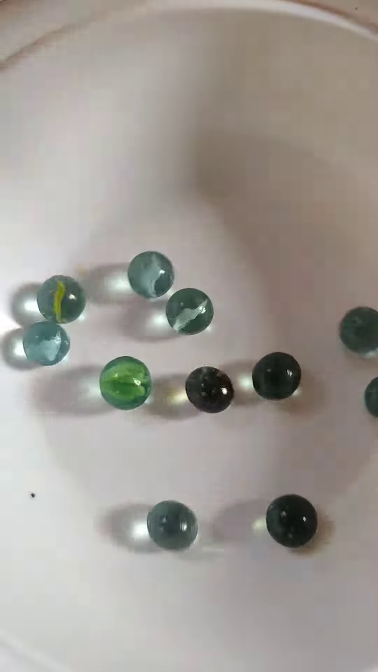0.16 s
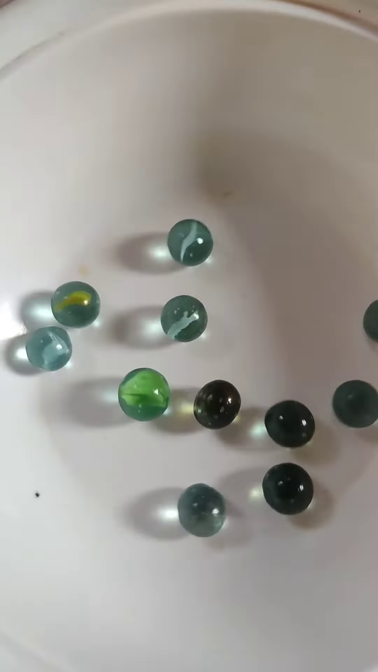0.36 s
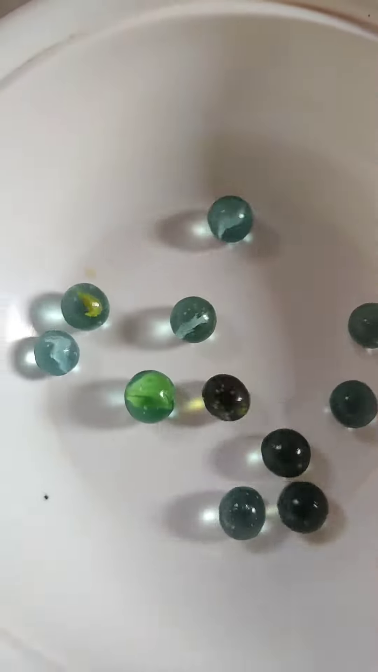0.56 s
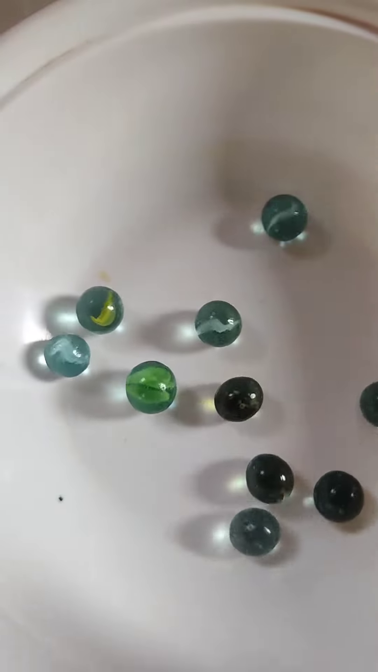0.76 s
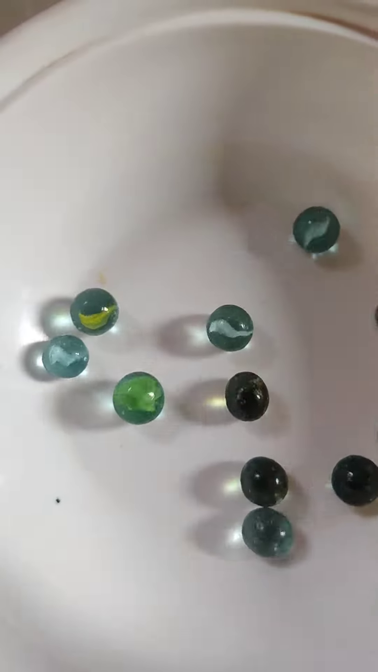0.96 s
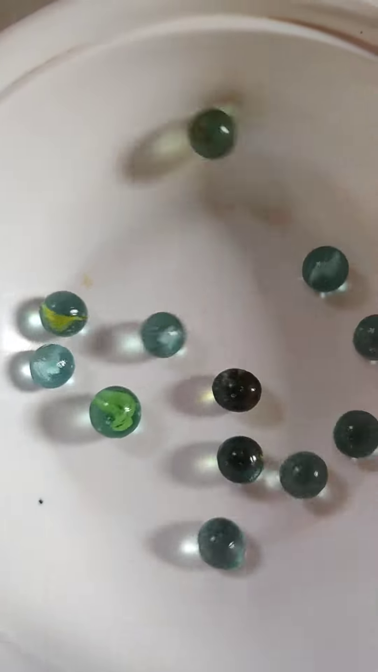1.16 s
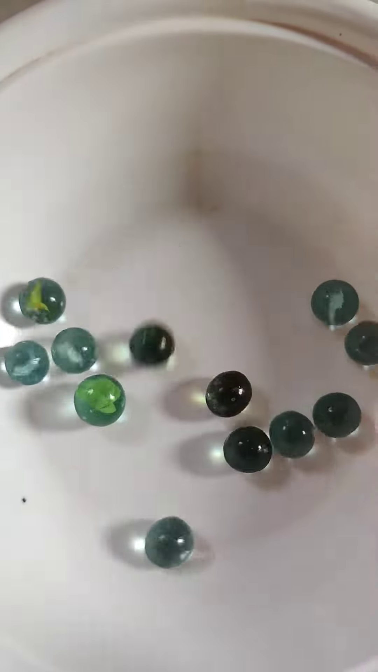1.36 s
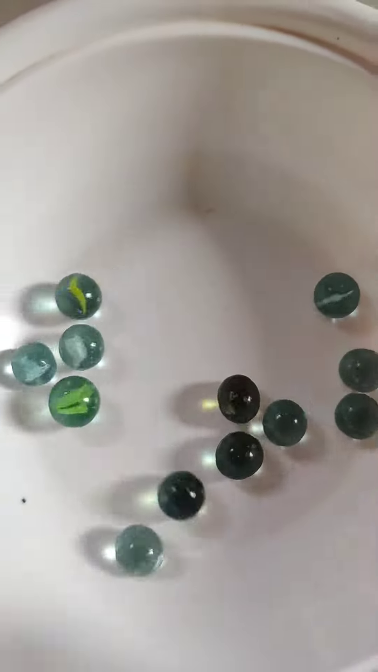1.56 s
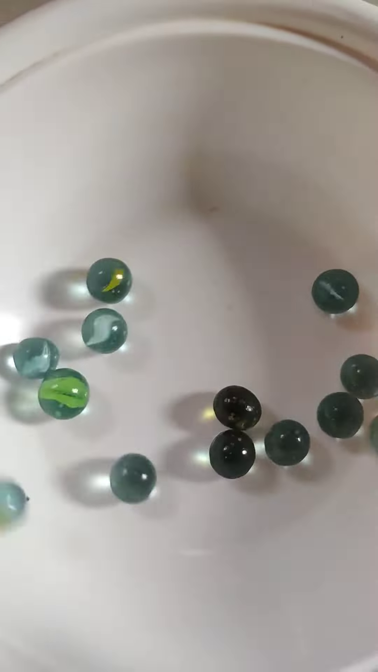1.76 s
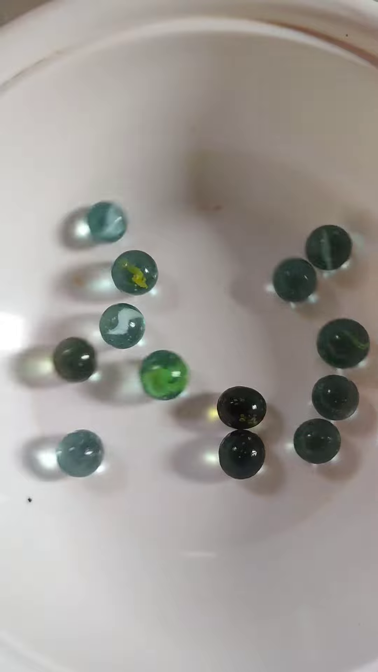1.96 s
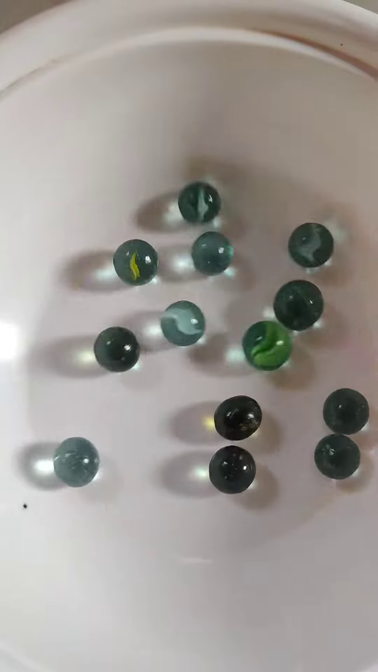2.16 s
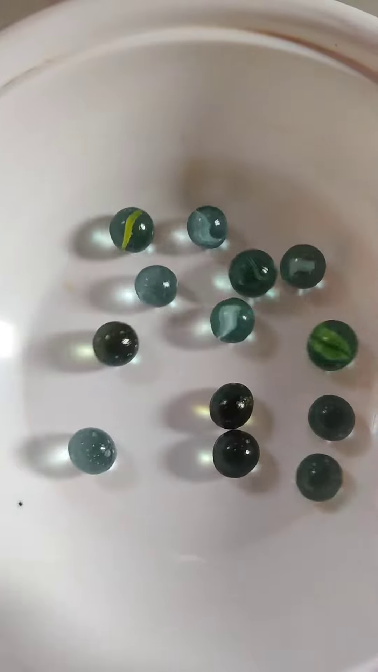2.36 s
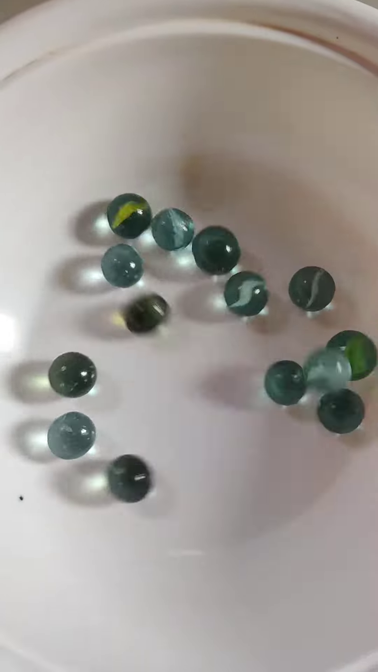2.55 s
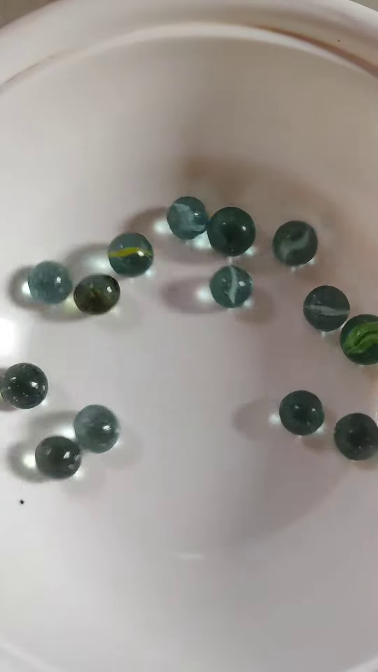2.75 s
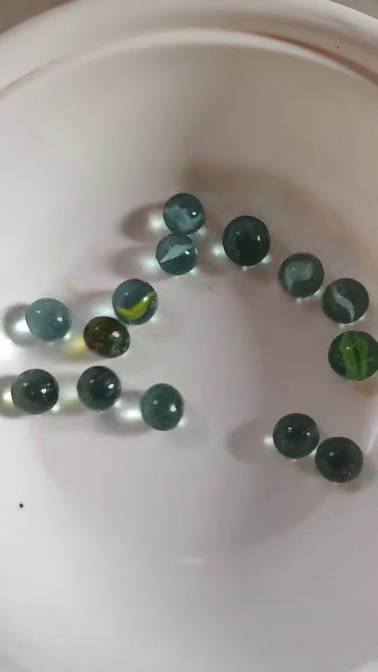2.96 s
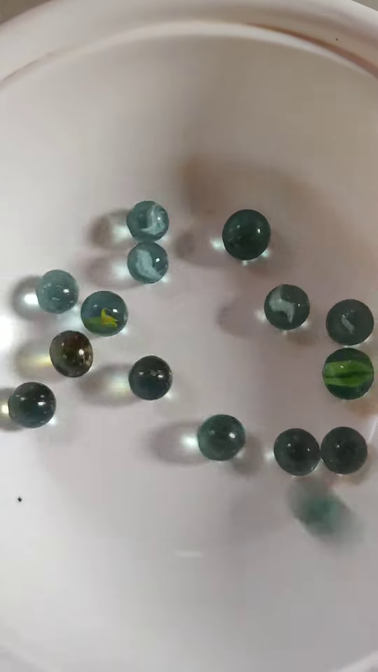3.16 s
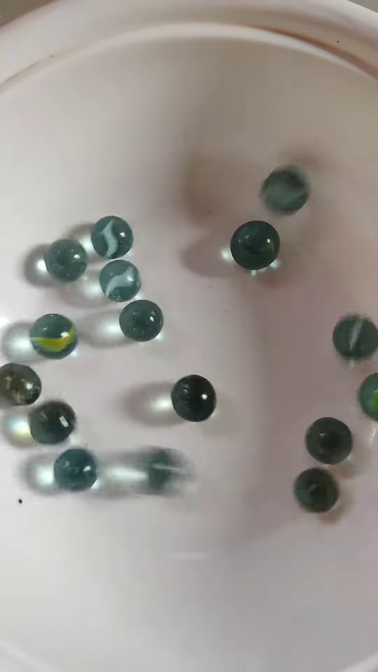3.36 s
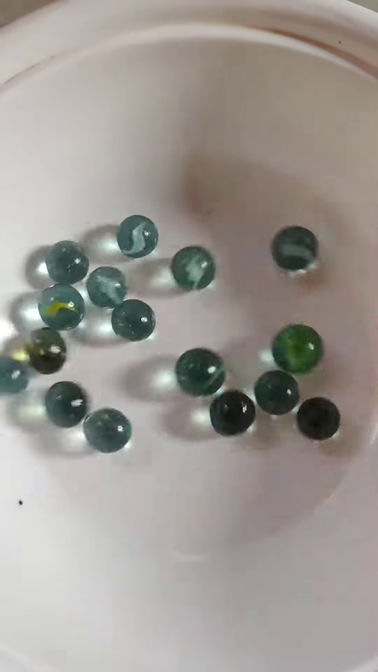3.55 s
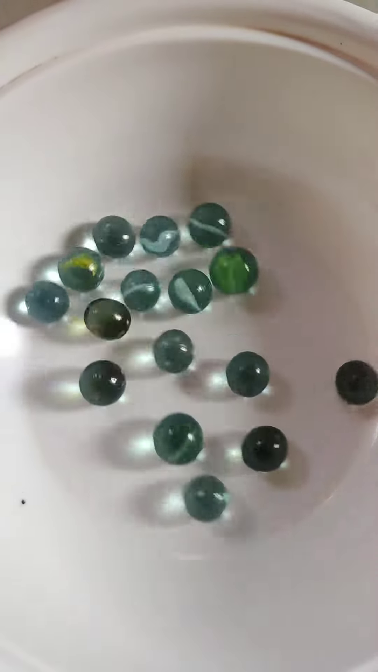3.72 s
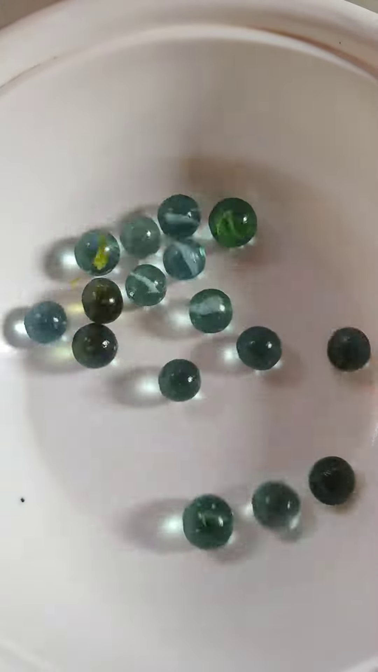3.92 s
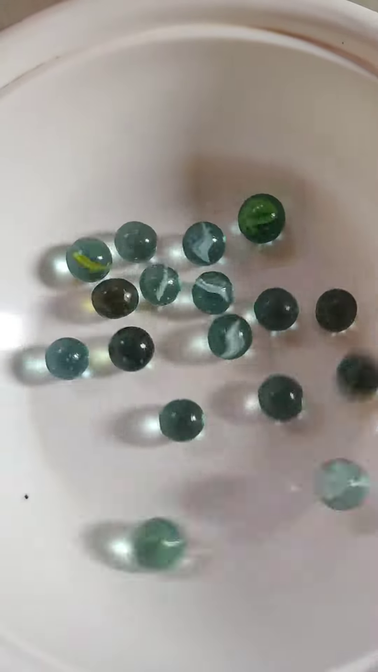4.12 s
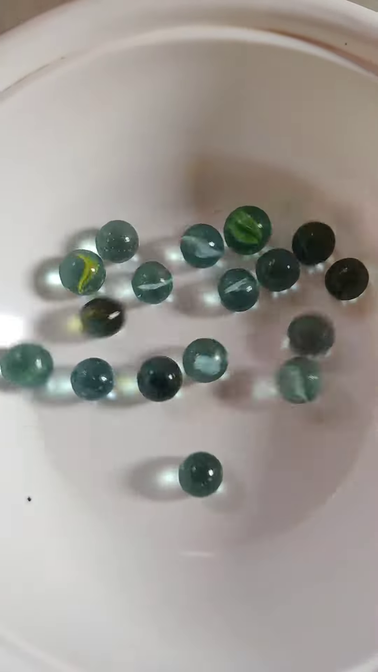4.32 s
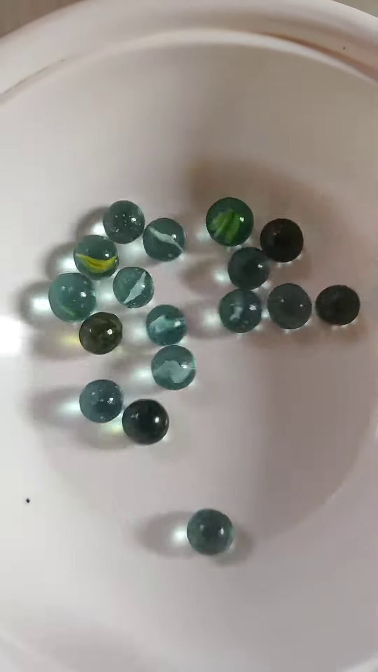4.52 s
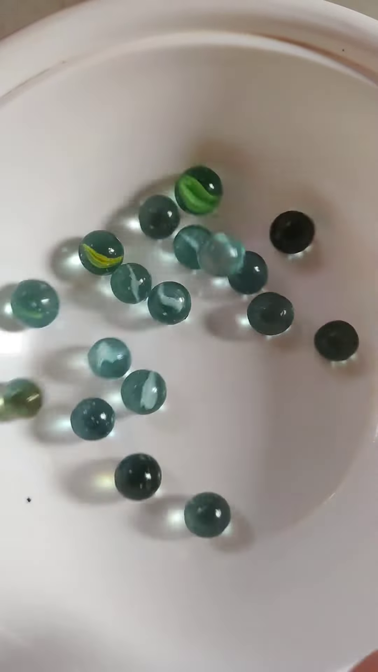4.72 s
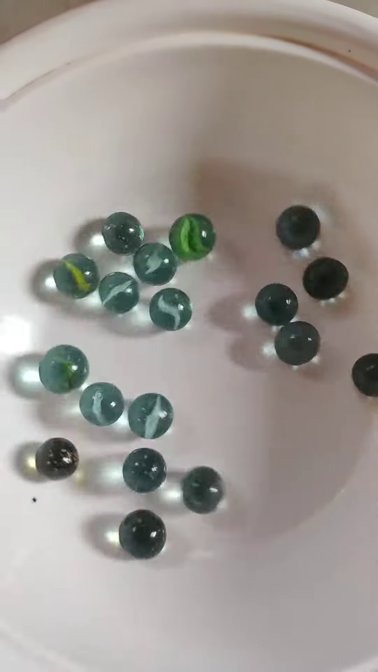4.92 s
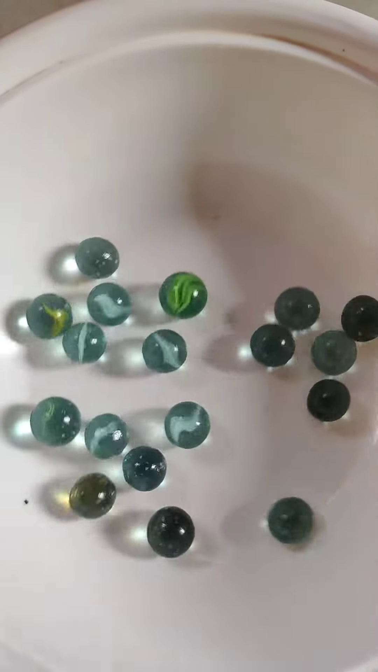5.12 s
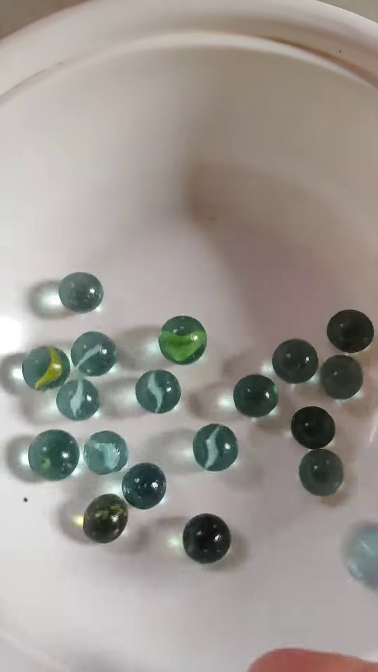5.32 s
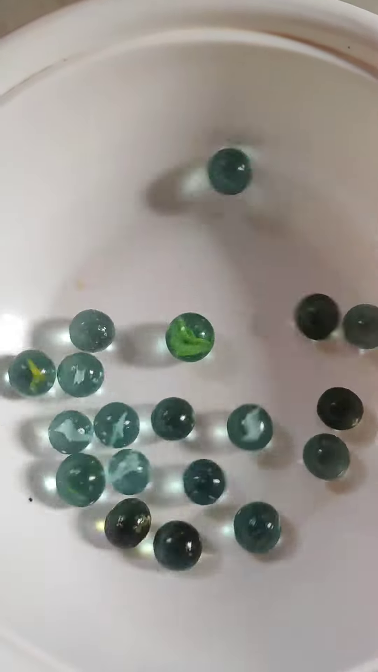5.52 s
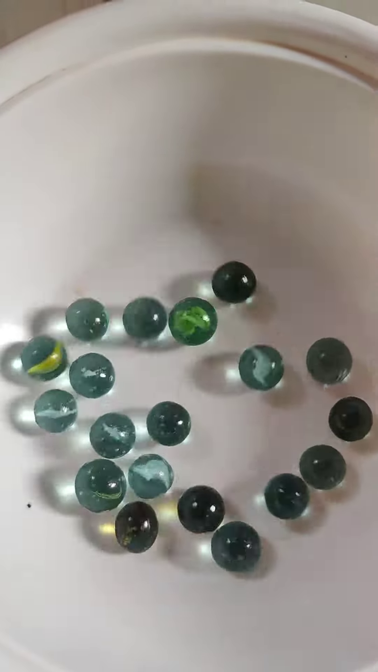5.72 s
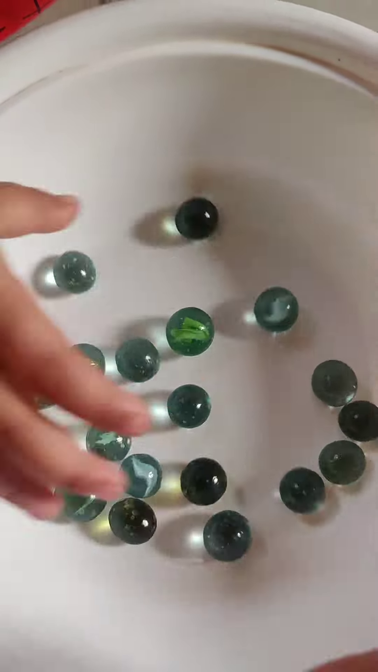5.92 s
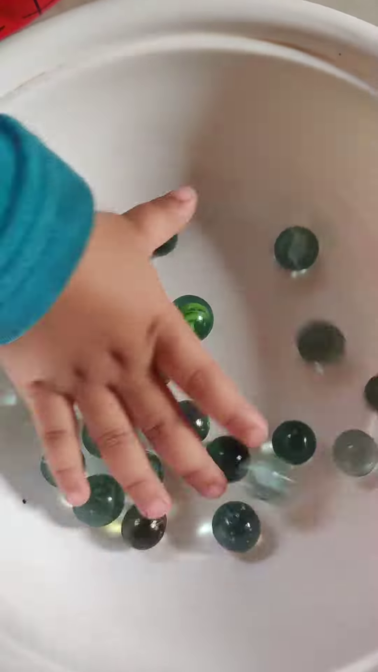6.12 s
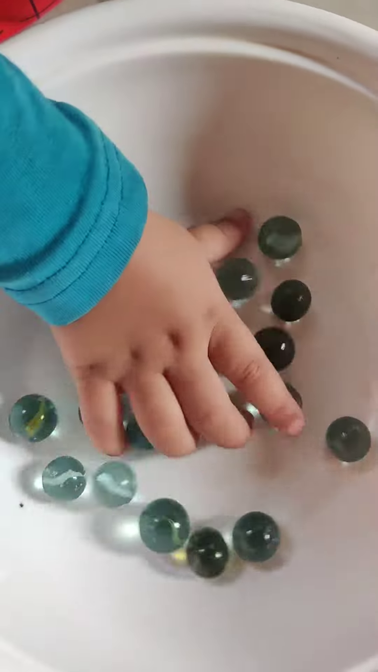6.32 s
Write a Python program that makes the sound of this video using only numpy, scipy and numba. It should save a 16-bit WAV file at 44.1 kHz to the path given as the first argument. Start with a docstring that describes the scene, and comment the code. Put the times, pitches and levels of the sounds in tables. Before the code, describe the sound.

Glass marbles clink in a plastic box, then drop one by one into a hard bowl, bouncing, ringing and rolling in clattering bursts.

```python
"""Small hard room, phone close above a wide bowl: quiet air, and earlier marbles' rolling already dying away.
Glass marbles clink in a plastic box, one scrapes out along its wall, and a soft low rumble swells.
From about 1.07 s marbles drop into the bowl one by one: each bounces, the bowl rings, the others roll and clatter.
Some hard blows thud and push the microphones off centre; ticks, single or in quick runs, sound towards the left.
From 2.4 s dry snaps of fingers picking marbles precede some drops; the phone limits the loudest blows throughout."""
import sys
import numpy as np
from scipy import signal
from scipy.fft import rfft, irfft
from scipy.io import wavfile
from scipy.ndimage import uniform_filter1d
from numba import njit

SR = 44100
rng = np.random.default_rng(int(sys.argv[2]) if len(sys.argv) > 2 else 0)


def store_pcm(level_fs):
    """Save levels as 16-bit WAV."""
    pcm = np.round(np.clip(level_fs, -1, 1) * 32767).astype(np.int16)
    wavfile.write(sys.argv[1], SR, np.atleast_2d(pcm).T)


N = 281358
TIME = np.arange(N) / SR
HZ = np.fft.rfftfreq(8192, 1 / SR) + 1  # filter grid, kept clear of zero

# Event levels are relative; each source adds its own trim.
# quiet room air, broad colour: f/Hz, level/dB
AIR = [(25, 5), (60, 1.5), (130, -7), (230, -6.5), (400, -12.5), (1000, -6.5), (4000, -35), (15000, -86)]
AIR_DB = -53
# a soft low rumble swells: middle, half length, level
LOW_RUMBLE_S, LOW_RUMBLE_HALF_S, LOW_RUMBLE_DB = 0.97, .11, -46
# reverberation of the room, broad colour: f/Hz, level/dB
ROOM_COLOUR = [(100, 1), (5000, 0), (15500, -5.5)]

# each dropped marble stirs up the others: t/s, glassy clatter level/dB, bowl rumble level/dB, hold time/s
DROPS = [(-.25, -25, -38, 0.22), (1.07, -25.5, -35, 0.23), (1.82, -29, -33.5, 0.33),
         (2.549, -24, -28.5, 0.11), (3.296, -24, -29, 0.29), (4.204, -26.5, -34, 0.34),
         (4.76, -26, -34.5, 0.18), (5.476, -21, -32, 0.14), (6.208, -23, -28.5, 0.35)]
# the stir builds quickly; afterwards the clatter dies sooner than the rolling
STIR_S, CLATTER_FADE_DB_PER_S, RUMBLE_FADE_DB_PER_S = .04, 53, 21
# marbles run back down the wall and crowd together:
# middle t/s, half length/s, glassy clatter level/dB, bowl rumble level/dB
RETURNS = [(0.335, 0.064, -42, -33.5), (.78, 0.095, -41, -40), (1.06, 0.09, -44, -38),
           (1.581, 0.1, -32, -27), (2.199, 0.04, -28.5, -33), (2.343, 0.049, -33, -32.5),
           (2.901, 0.089, -28.5, -52), (3.734, 0.066, -26, -33), (3.88, 0.083, -25.5, -29),
           (4.094, 0.076, -31.5, -30.5), (4.461, 0.024, -24, -27), (5.364, 0.42, -39, -36.5),
           (5.664, 0.049, -25.5, -35), (5.816, 0.016, -38, -30), (6.05, 0.23, -39, -38.5)]
HOP_S = .011  # usual time between the hops of a rolling marble
# broad colour of a contact in the bowl: f/Hz, level/dB
CONTACT = [(40, -15), (150, -27.5), (450, -18), (750, -8.5), (1100, -6), (2100, -7), (3200, -0.5),
           (5000, 5), (6500, 3.5), (7900, -10.5), (10000, -12), (15500, -18)]
# bowl resonances: f/Hz, width/Hz, lift at left port/dB, lift at right port/dB (below 0 dB: none there)
BOWL = [(234.4, 4, 14, 18.5), (690, 130, 7, 1), (868.5, 125, 10, -4.5), (998, 96, 13.5, 9.5),
        (1058, 200, 5.5, 5.5), (1256, 10, 11.5, -10), (1631, 107, 6.5, 9), (2630, 106, 10.5, 11.5),
        (2870, 196, 11, 5.5), (3510, 95, 11, 2.5), (3703, 214, 7.5, 7.5), (4120, 150, 1.5, 8.5),
        (4430, 65, 11, -4.5), (4874, 150, 9.5, -8), (5260, 190, 6, -6.5), (6450, 85, 5.5, 0),
        (7140, 260, -27, 8)]

# marbles clinking in the box: t/s, level/dB
CLINKS = [(0.1128, -11), (0.1268, -6), (0.3253, -15.5), (0.3503, -10), (0.386, -17), (0.4695, -20),
          (0.5066, -13.5), (0.5723, -20), (0.6277, -17.5), (0.649, -33), (0.743, -23)]
# box resonances, alike at both ports: f/Hz, width/Hz, lift/dB
BOX = [(1870, 400, 24), (2640, 180, 14.5), (4440, 240, 13.5), (5720, 640, 8), (7790, 98, 18.5),
       (10430, 400, 18), (12140, 500, 19.5), (14150, 130, 21)]
# broad colour of the clinking box: f/Hz, level/dB
BOX_COLOUR = [(100, -14), (500, -11), (900, 3), (1500, -18), (4000, 6.5), (7000, 7), (9000, -5.5),
              (15500, -17.5)]
# broad colour of a marble scraping along the box wall: f/Hz, level/dB
SLIDE_COLOUR = [(200, -27), (3000, -12), (5500, 6), (7000, 7), (10000, -1.5), (15500, -13)]
# the scrape out of the box: loudest moment, level there, rise and fall
SLIDE_S, SLIDE_DB, SLIDE_RISE_DB_PER_S, SLIDE_FALL_DB_PER_S = 0.662, -20.5, 371, 378

# landings, bounces and hard collisions: t/s, level/dB, share of hollow bowl body/dB, left minus right/dB
KNOCKS = [(0.892, -27, -16, -3), (1.072, -10, -9, 1), (1.093, -5, -21.5, -10), (1.146, -10, -22, 0),
          (1.166, -17.5, -4, 4), (1.191, -9, -7, -1.5), (1.216, -12.5, -18, 14), (1.226, -11, -12.5, -5),
          (1.271, -12.5, -7, -7), (1.299, -19, -20, -16), (1.316, -19.5, -13.5, 2), (1.371, -17, -12, 1),
          (1.481, -21, -7.5, 6), (1.533, -20.5, -4.5, 3), (1.588, -19, -16, 7), (1.618, -16, -19, 11),
          (1.776, -0.5, -14.5, -2), (1.791, -8, -15, -9), (1.819, -9, -21, 0.5), (1.881, -12, -6, -2),
          (1.9, -11.5, -30, -4), (1.951, -11.5, -20, -1), (1.972, -10, -14, -5), (2.021, -13.5, -6.5, -0.5),
          (2.042, -18, -12, -8), (2.563, -2, -13.5, 3.5), (2.61, -29, 8, -6), (2.625, -19.5, -7.5, 17),
          (2.65, -13.5, -5, -9), (2.682, -14, -6, 4), (2.703, -13, -15, -6), (2.753, -9.5, -11, 2),
          (2.79, -13, -13.5, -7), (2.862, -22, -25, 1), (3.114, -25.5, -8, 8), (3.178, -34.5, -0.5, 3),
          (3.27, -5, -12.5, 1), (3.281, -8.5, -14.5, 3), (3.326, -13, -10.5, -4), (3.372, -9, -40, 2),
          (3.427, -6.5, -17, 5), (3.448, -8.5, -21, 0), (3.489, -12.5, -18, 1), (3.499, -12, -20, 10),
          (3.527, -10, -23, 1.5), (3.662, -11, -19.5, -4.5), (3.9, -19.5, -12, 26), (4.028, -20, -23, 4),
          (4.196, -4.5, -9.5, -5), (4.208, -6, -21.5, 1), (4.25, -6, -14, 6), (4.3, -13.5, -13, 1),
          (4.319, -12.5, -9.5, 1), (4.364, -9, -17, -4), (4.44, -16.5, -12.5, -2), (4.457, -15.5, -4, 0.5),
          (4.718, -10, -13, -1), (4.729, -8, -38, -4), (4.786, -10.5, -6.5, -6), (4.79, -11.5, -9.5, 2.5),
          (4.859, -12, -8.5, -3), (4.882, -14, -12.5, -16), (4.911, -11, -8, 0.5), (4.955, -10, -21, -1),
          (5.471, -3.5, -15, 5), (5.474, -3, -14, -4), (5.522, -10, -14, 0), (5.58, -12.5, -10.5, -4),
          (5.629, -16, -10, -12), (5.824, -18.5, -6.5, 0), (6.217, -5, -21, -0.5),
          (6.223, -8.5, -10.5, -4.5), (6.249, -10.5, -6, 2), (6.271, -12.5, -31, -10),
          (6.304, -11.5, -24, -4)]
# microphone heave after some hard blows: t/s, left level/dB, right level/dB
HEAVES = [(1.095, -31, -17.5), (1.148, -24, -30), (1.777, -2, -11), (2.755, -14.5, -42),
          (3.271, -17.5, -22), (3.424, -19.5, -36), (3.528, -23.5, -51), (4.205, -9, -24),
          (4.736, -17.5, -44), (4.914, -25.5, -32), (5.469, -12, -19.5), (6.219, -14.5, -18)]
# a marble ticks against its neighbour, singly or in a quick run: t/s, length/s, level/dB
TICK_RUNS = [(1.649, .026, -16), (2.149, .07, -15), (2.311, .015, -12.5), (3.929, .062, -13),
             (4.4255, .005, -3), (4.561, .038, -11.5), (4.685, .005, -17), (5.233, .005, -19),
             (5.2792, .005, -9), (5.3353, .005, -8), (5.436, .026, -13.5), (5.988, .005, -14.5)]
# broad colour of those ticks: f/Hz, level/dB
TICK_COLOUR = [(200, -48), (900, -4.5), (2000, -16), (3500, -3), (5100, 7), (6200, -5.5), (7800, -13.5),
               (15500, -31)]
# dry bright snaps, as fingers pick the next marble from the box: t/s, level/dB
SNAPS = [(2.416, -31), (2.454, -24), (3.234, -17.5), (5.411, -20), (6.18, -23.5)]
TOP_HZ = 15700  # upper limit of the phone


def amp(db):
    """Decibels to gain."""
    return 10 ** (np.asarray(db) / 20)


def unit(x):
    """Scaled to rms 1."""
    return x / np.sqrt(np.mean(x ** 2))


def sides(pan_db):
    """Left and right gains for a level difference, at constant mean power."""
    gains = amp(np.array([[.5], [-.5]]) * pan_db)
    return gains / np.sqrt(np.mean(gains ** 2, axis=0))


def colour(points, modes=()):
    """Gain per frequency at both microphone ports: a broad slope with resonances standing on it."""
    hz, db = np.transpose(points)
    power = np.ones((2, len(HZ)))
    for centre, width, *lift_db in modes:
        lift = np.maximum(amp(lift_db)[:, None] ** 2 - 1, 0)
        power += lift / (1 + (2 * (HZ - centre) / width) ** 2) ** 1.54
    slope = amp(np.interp(np.log(HZ), np.log(hz), db))
    return slope * np.sqrt(power)


def ring(x, gain):
    """Sound through the causal minimum-phase filter with this gain, so that resonances ring after a blow."""
    cepstrum = irfft(np.log(gain + 1e-6))
    # folding the cepstrum onto positive time makes the filter causal
    fold = 1 + np.sign(len(HZ) - 1 - np.arange(cepstrum.shape[1]))
    fold[0] = 1
    impulse = irfft(np.exp(rfft(cepstrum * fold)))
    return signal.oaconvolve(x, impulse, axes=1)[:, :N]


def add(track, s, sound):
    """Mixes a sound in at a time."""
    start = max(int(s * SR), 0)
    part = track[:, start:start + sound.shape[1]]
    part += sound[:, :part.shape[1]]


def ports(size, alike):
    """Noise at the two microphone ports, partly shared."""
    shared, *own = rng.standard_normal((3, size))
    alike = np.clip(alike, 0, 1)
    return np.sqrt(alike) * shared + np.sqrt(1 - alike) * np.array(own)


def swell(middle_s, half_s):
    """A smooth rise and fall around a moment."""
    return np.exp(-((TIME - middle_s) / half_s) ** 2 / 2)


def background(centre_hz=205, width_hz=85):
    """Quiet room air as coloured noise, and the brief low rumble as a narrow band of noise."""
    band = np.ones((2, 1)) / (1 + (2 * (HZ - centre_hz) / width_hz) ** 2)
    low_rumble = unit(ring(ports(N, alike=0.96), band))
    air = unit(ring(ports(N, alike=0.68), colour(AIR)))
    return amp(AIR_DB) * air + amp(LOW_RUMBLE_DB) * swell(LOW_RUMBLE_S, LOW_RUMBLE_HALF_S) * low_rumble


def room(x, t60_s=0.64, wet_db=-7, build_s=0.0019):
    """A small hard room: a diffuse tail that builds after the direct sound."""
    t = TIME[:SR]
    decay = np.exp(-np.log(1000) * t / t60_s)
    tail = rng.standard_normal((2, SR)) * decay * (1 - np.exp(-t / build_s)) ** 2
    wet = signal.oaconvolve(x, unit(tail) / np.sqrt(SR), axes=1)[:, :N]
    return x + amp(wet_db) * ring(wet, colour(ROOM_COLOUR))


def stir(start_s, hold_s, fade_db_per_s):
    """Motion after a drop: it builds, holds, then friction takes it away."""
    age = TIME - start_s
    return np.clip(age / STIR_S, 0, 1) * amp(-fade_db_per_s * np.maximum(age - hold_s, 0))


def motion():
    """Strength of clatter and of rumble, summed in power over drops and returning marbles."""
    clatter, rumble = np.zeros((2, N))
    for s, clatter_db, rumble_db, hold_s in DROPS:
        clatter += (amp(clatter_db) * stir(s, hold_s, CLATTER_FADE_DB_PER_S)) ** 2
        rumble += (amp(rumble_db) * stir(s, hold_s, RUMBLE_FADE_DB_PER_S)) ** 2
    for s, half_s, clatter_db, rumble_db in RETURNS:
        clatter += (amp(clatter_db) * swell(s, half_s)) ** 2
        rumble += (amp(rumble_db) * swell(s, half_s)) ** 2
    return np.sqrt(clatter), np.sqrt(rumble)


def chatter(gap_s, spread_db, tick_s, grind_db, count=2):
    """Marbles hop in short runs of nearly even ticks over a steady grind; gives the loudness envelope."""
    taps = np.zeros(N)
    for _ in range(count):
        hops = rng.standard_normal((2048, 2))
        runs = np.repeat(rng.standard_normal((256, 2)), 8, axis=0)  # eight hops share a pace and a force
        gaps = gap_s * np.exp(.4 * runs[:, 0] + .22 * hops[:, 0])
        at = (np.cumsum(gaps) * SR).astype(int)
        size = amp(spread_db * np.clip(runs[:, 1] + hops[:, 1], -2, 2))
        taps[at[at < N]] += size[at < N] ** 2
    power = signal.lfilter([1], [1, -np.exp(-2 / (tick_s * SR))], taps)
    power /= uniform_filter1d(power, SR // 10) + 1e-9  # evens the level over 0.1 s
    return unit(np.sqrt(np.maximum(power, 0) + amp(grind_db) ** 2))


def registers(low_hz=2200, high_hz=7500):
    """The bowl's colour in three registers of equal power: hollow body, glassy click, top crack."""
    above_low = 1 / (1 + (low_hz / HZ) ** 8)
    above_high = 1 / (1 + (high_hz / HZ) ** 24)
    shares = 1 - above_low, above_low * (1 - above_high), above_high
    return [unit(colour(CONTACT, BOWL) * np.sqrt(share)) for share in shares]


def rolling(body_db=-0.5, click_db=-3.0, crack_db=-17, left_db=2):
    """Marbles circle the bowl and jostle; every small hop rumbles, clicks and faintly cracks."""
    clatter, rumble = motion()
    hops = chatter(gap_s=HOP_S, spread_db=2.5, tick_s=.0038, grind_db=-2.5)
    body, click, crack = registers()
    rumbling = ring(hops * rumble * amp(body_db) * ports(N, alike=0.26), body)
    clicking = ring(hops * clatter * amp(click_db) * ports(N, alike=0.11), click) * sides(left_db)
    cracking = ring(hops * clatter * amp(crack_db) * ports(N, alike=0.27), crack)
    return rumbling + clicking + cracking


def contact(snap_s, wall_s, wall_db, alike, ping_db,
            low_hz=2500, high_hz=7500, ping_s=0.0076, place=0.25, count=6):
    """A hard buzz of a few milliseconds; reflections die between the walls and a few partials ping on."""
    t = TIME[:3072]
    buzz = ports(len(t), alike)
    # near echoes and pinging partials differ with the point of contact, so each blow has its own colour
    echoes = rng.standard_normal((2, 48))
    buzz = unit(buzz + place * signal.oaconvolve(buzz, echoes, axes=1)[:, :len(t)])
    # one partial at random in each of several equal bands
    hz = low_hz + (high_hz - low_hz) * (np.arange(count) + rng.random(count))[:, None] / count
    phase = rng.random((2, count, 1))
    ping = unit(np.sin(2 * np.pi * (hz * t + phase)).sum(axis=1))
    envelope = 1 / (1 + (t / snap_s) ** 6) + amp(wall_db) * np.exp(-t / wall_s)
    return buzz * envelope + amp(ping_db) * ping * np.exp(-t / ping_s)


def strays(level_db=2, spread_db=6.5, body_db=-3, pan_db=5, count=130):
    """Stray collisions at random moments, scattered in force around the strength of the marbles' motion."""
    clatter, rumble = motion()
    drive = np.zeros((2, 2, N))  # body and click
    for k in range(count):
        at = int((k + rng.random()) / count * (N - 1))
        loud, hollow, side = np.clip(rng.standard_normal(3), -2, 2)
        blow = sides(pan_db * side) * contact(
            snap_s=0.0014, wall_s=0.0047, wall_db=-9.5, alike=0.13, ping_db=-24, low_hz=766, high_hz=6820)
        add(drive[0], at / SR, blow * rumble[at] * amp(level_db + body_db + spread_db * hollow))
        add(drive[1], at / SR, blow * clatter[at] * amp(level_db + spread_db * loud))
    return sum(ring(x, gain) for x, gain in zip(drive, registers()))


def box(clink_db=-5, left_db=-2):
    """Marbles clink in the small resonant box; one scrapes along its wall and out as chattering noise."""
    drive = np.zeros((2, N))
    for s, peak_db in CLINKS:
        add(drive, s, amp(peak_db + clink_db) * contact(
            snap_s=0.0039, wall_s=0.13, wall_db=-16, alike=0.3,
            ping_db=-2, low_hz=7150, high_hz=14270, ping_s=0.011))
    age = TIME - SLIDE_S
    slide = amp(SLIDE_DB + np.minimum(SLIDE_RISE_DB_PER_S * age, -SLIDE_FALL_DB_PER_S * age))
    hops = chatter(gap_s=HOP_S, spread_db=7.5, tick_s=0.0028, grind_db=-3)
    scrape = hops * slide * ports(N, alike=0.15)
    clinking = ring(drive, unit(colour(BOX_COLOUR, BOX)))
    scraping = ring(scrape, unit(colour(SLIDE_COLOUR)))
    return sides(left_db) * (clinking + scraping)


def knocks(body_db=3, click_db=-4.0, crack_db=-19, wall_crack_db=-11, usual_db=-10, brighten=0.46):
    """Each blow clicks and cracks, the harder the brighter; one striking the bowl squarely adds hollow body."""
    drive = np.zeros((3, 2, N))  # body, click and crack
    for s, level_db, share_db, pan_db in KNOCKS:
        blow = sides(pan_db) * amp(level_db)
        hard_crack = amp(crack_db + brighten * (level_db - usual_db))
        crack = np.hypot(hard_crack, amp(share_db + wall_crack_db))
        add(drive[0], s, blow * amp(share_db + body_db) * contact(
            snap_s=0.0036, wall_s=0.025, wall_db=-5, alike=0.47,
            ping_db=-12.5, low_hz=963, high_hz=1735, ping_s=0.006))
        add(drive[1], s, blow * amp(click_db) * contact(
            snap_s=0.0047, wall_s=0.016, wall_db=-4, alike=.15, ping_db=-10.5))
        add(drive[2], s, blow * crack * contact(
            snap_s=0.0047, wall_s=0.03, wall_db=-2.5, alike=0.065,
            ping_db=-8, low_hz=7640, high_hz=15600, ping_s=0.015))
    return sum(ring(x, gain) for x, gain in zip(drive, registers()))


def heave(swing_hz=5.2, settle_s=0.1, rise_s=0.0035, kick_s=0.011, thud_db=-15, thud_s=0.018, thud_hz=300):
    """Some hard blows thud and push the overloaded microphones off centre; each swings back in its own way."""
    offset, thuds, t = np.zeros((2, N)), np.zeros((2, N)), TIME[:SR // 2]
    phase = np.array([[1], [-2]])  # left and right, radians
    sway = np.exp(-t / settle_s) * np.cos(2 * np.pi * swing_hz * t + phase)
    swing = np.exp(-t / kick_s) + 0.7 * sway
    for s, *db in HEAVES:
        add(offset, s, amp(db)[:, None] * swing * (1 - np.exp(-t / rise_s)))
        add(thuds, s, amp(db)[:, None] * ports(len(t), alike=1.0) * np.exp(-t / thud_s))
    low_pass = np.ones((2, 1)) / (1 + (HZ / thud_hz) ** 2)
    return offset + amp(thud_db) * ring(thuds, unit(low_pass))


def ticks(level_db=-5, left_db=10, scatter_db=0.5, jitter_s=.0012):
    """A marble ticks against its neighbour near the left wall, singly or once per hop: short glassy contacts."""
    drive = np.zeros((2, N))
    for start_s, length_s, peak_db in TICK_RUNS:
        for s in np.arange(start_s, start_s + max(length_s, HOP_S / 2), HOP_S):
            late, loud = rng.standard_normal(2)
            tick = contact(snap_s=0.0023, wall_s=0.011, wall_db=-14.5, alike=0.055, ping_db=-20)
            at_s = s + jitter_s * late * (s > start_s)  # a single or first tick is on time
            add(drive, at_s, amp(peak_db + level_db + scatter_db * loud) * tick)
    return sides(left_db) * ring(drive, unit(colour(TICK_COLOUR, BOWL)))


def snaps(level_db=-6, corner_hz=4000):
    """Brief bright snaps: short contacts through a gentle high-pass, with no resonance of bowl or box."""
    drive = np.zeros((2, N))
    for s, peak_db in SNAPS:
        add(drive, s, amp(peak_db + level_db) * contact(
            snap_s=0.0045, wall_s=0.0055, wall_db=-27, alike=0.23, ping_db=-22))
    high_pass = np.ones((2, 1)) * HZ / np.hypot(HZ, corner_hz)
    return ring(drive, unit(high_pass))


def scene():
    """Bowl and box in the room, with the air, the low rumble and the heaving microphones."""
    marbles = rolling() + strays() + box() + knocks() + ticks() + snaps()
    return background() + room(marbles) + heave()


@njit
def follow(x, release):
    """Peak follower: instant rise, gradual fall."""
    out, e = np.empty(len(x)), 0.
    for i in range(len(x)):
        e = max(abs(x[i]), e * release)
        out[i] = e
    return out


def record(dry, ceiling=0.91, release_s=0.0021):
    """The phone limits each channel by its followed peaks, then cuts the top with a steep low-pass."""
    peaks = np.array([follow(x, np.exp(-1 / (release_s * SR))) for x in dry])
    limited = dry / np.maximum(peaks / min(ceiling, 1), 1)
    return signal.sosfilt(signal.ellip(8, .2, 60, TOP_HZ, fs=SR, output="sos"), limited)


dry = scene()
out = record(dry)
store_pcm(out)
```